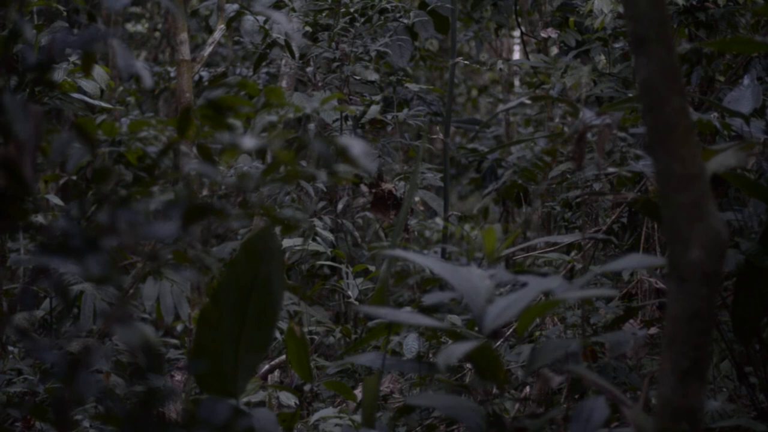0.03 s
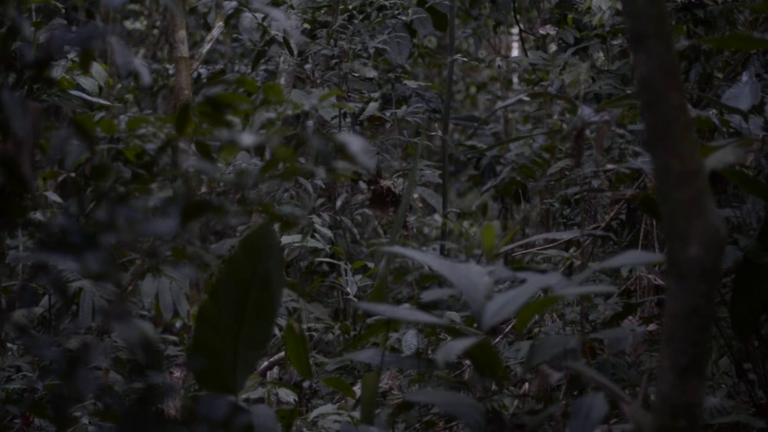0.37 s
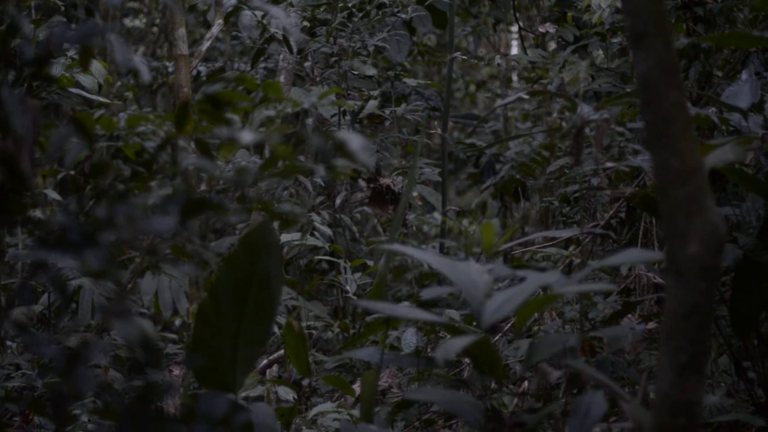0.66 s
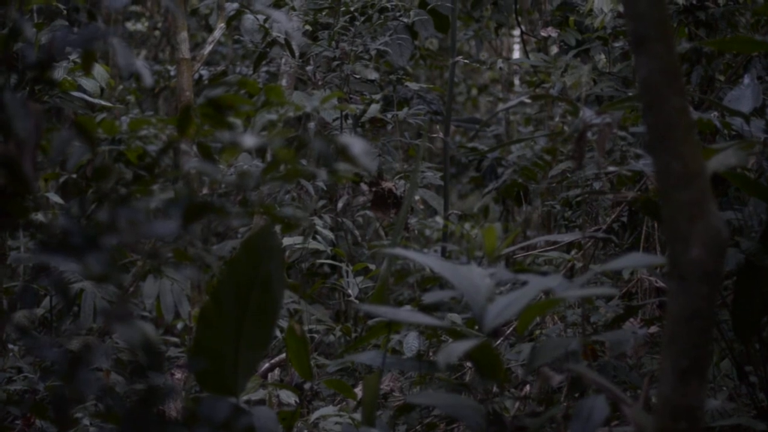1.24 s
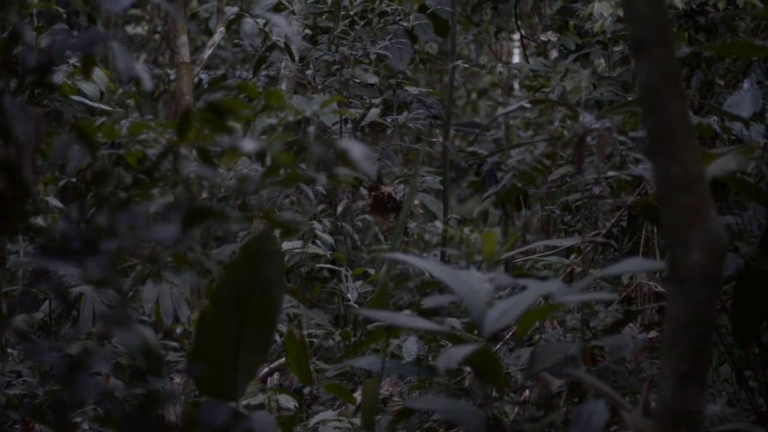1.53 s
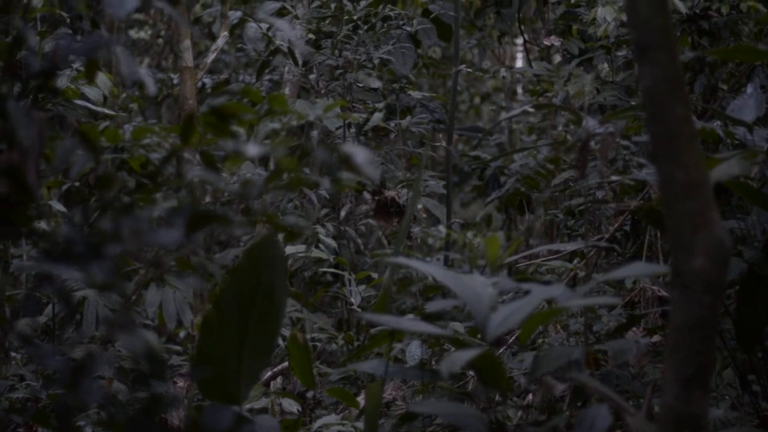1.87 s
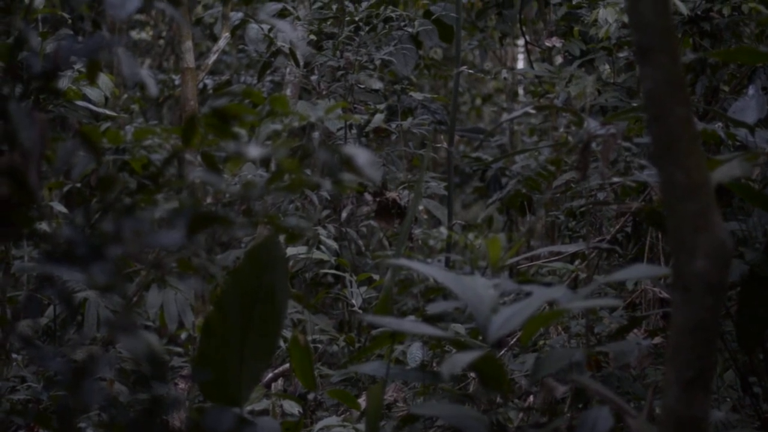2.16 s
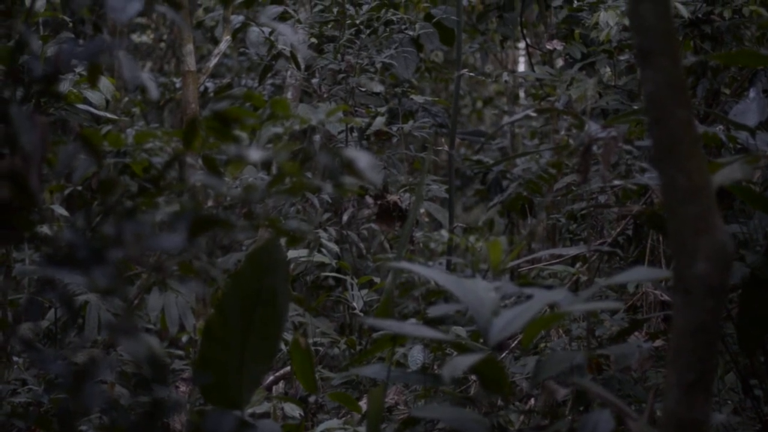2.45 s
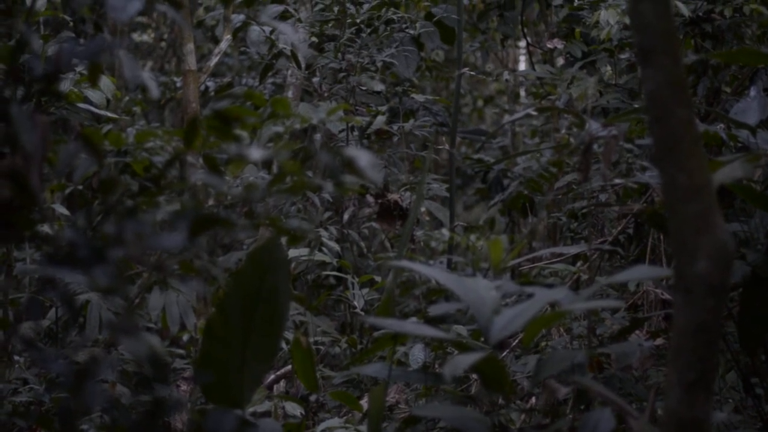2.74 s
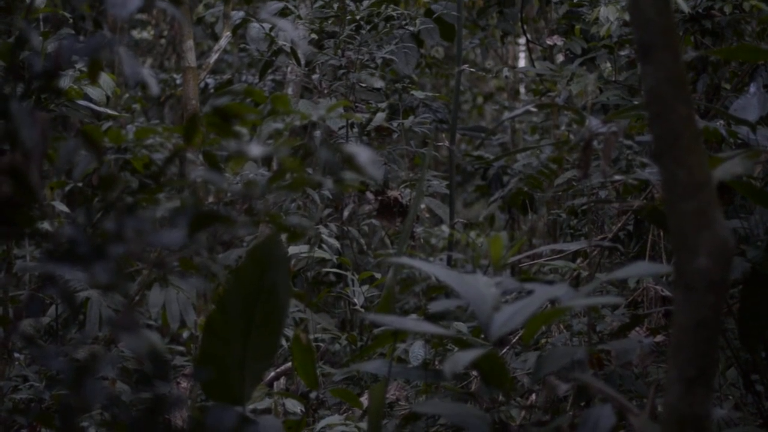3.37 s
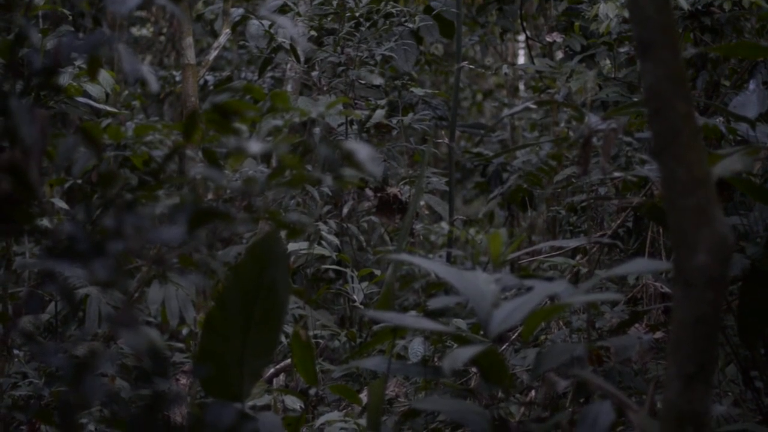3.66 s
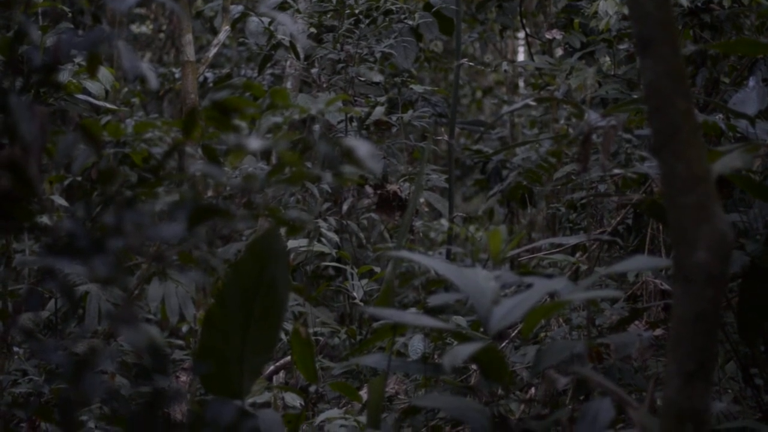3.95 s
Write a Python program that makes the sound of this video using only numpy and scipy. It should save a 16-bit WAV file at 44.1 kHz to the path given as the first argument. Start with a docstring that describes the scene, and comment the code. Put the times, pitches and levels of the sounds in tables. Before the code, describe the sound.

Crickets fill a nighttime rainforest with steady, high trilling and buzzing. Throughout, a nearby frog calls in an even rhythm, each rasp followed by a quick falling double gulp. Tiny peeps and faint far whistles echo lightly among the trees.

```python
"""Rainforest undergrowth at night. Crickets trill in trains of tone pulses and bush crickets buzz in
bands of file noise, over a wash of far insects and the hooting drone of far frogs. A near frog repeats
a two-part call: a rasp, made by pulses that ring its vocal sac, then a falling double gulp. Small peeps
and a few faint far whistles come through, and the trees scatter the trills and calls into reverberation."""
import sys
import numpy as np
from scipy import signal
from scipy.fft import rfft, irfft
from scipy.io import wavfile

SR = 44100
rng = np.random.default_rng(int(sys.argv[2]) if len(sys.argv) > 2 else 0)


def waveform_to_disk(signal):
    """Save audio, clipped to [-1, 1], as 16-bit WAV at the path in sys.argv[1]."""
    frames = np.transpose(np.atleast_2d(signal))
    scaled = np.clip(frames, -1, 1) * 32767
    samples = np.round(scaled).astype(np.int16)
    wavfile.write(sys.argv[1], SR, samples)


N = 176400

# Reverberation among the trees. Each row: frequency in Hz, time to decay by 60 dB in seconds.
FOREST_DECAY = [(300, 0.35), (750, 0.68), (1200, 0.89), (1800, 0.98), (4000, 1), (10000, 0.21)]

# Spectra of far insects, of still air and far leaves, and of a faint top hiss.
# Each row: frequency in Hz, relative spectral density in dB.
INSECT_SPECTRUM = [(1800, -29), (2500, -18), (3150, 1.5), (3700, 12), (3900, 4.5), (4200, -4.5),
                   (4700, -7.5), (5350, -1.5), (5750, 1), (6350, -4), (6650, -11), (6900, -18), (7050, -8),
                   (7650, -1.5), (8100, -10.5), (8900, -20), (9400, 0), (9700, -5.5), (9930, -21.5),
                   (10400, -35.5), (12000, -65.5)]
AIR_SPECTRUM = [(20, -16.5), (60, -6), (130, -0.5), (300, 1.5), (450, 0), (750, 3.5), (1100, 2), (1600, 13),
                (2200, 7.5), (3000, 15), (5000, -29)]
HISS_SPECTRUM = [(8000, -27), (10300, -4), (11600, -1.5), (12600, -8), (14000, -25.5), (15000, -45.5)]
# The course of the top hiss. Each row: time in seconds, level in dB.
HISS_LEVELS = [(0, -73.5), (1.199, -74.5), (2.002, -71), (2.779, -68), (2.9, -74), (4, -73)]
INSECTS_DB, AIR_DB = -36, -52

# Trilling and hooting animals. Each row: pitch in Hz, pitch wander in Hz, fall within a pulse in Hz,
# pulses per second, level in dB.
NEAR_CRICKETS = [(3623, 12.24, 60, 25, -33.5), (3408, 3, 6, 11.5, -36.5)]
FAR_CRICKETS = [(3602, 22, 41, 38, -33), (3659, 16, 26, 17, -35), (3410, 12, 14, 12, -38.5),
                (3228, 9.98, 13, 19, -44), (3767, 9, 7.1, 16, -44.5), (4019, 28, 50, 16, -45.5),
                (3015, 8, 9.6, 8, -52.5)]
FAR_FROGS = [(1336.4, 2.4, 4.6, 9, -44), (1366.5, 6.01, 14, 14, -47.5)]
# Bush crickets. Each row: band centre in Hz, half width in Hz, wing strokes per second,
# modulation depth from 0 to 1, level in dB.
BUSH_CRICKETS = [(6111, 160, 16.3, 0.23, -38.5), (6080, 160, 108, 0.6, -41), (7736, 70, 29, 0.3, -50),
                 (8260, 78, 100, 0.2, -53), (8750, 64, 17, 0, -54.5), (9550, 103, 72, 0.26, -46)]
RATE_DRIFT, TRILL_SWELL_DB = 0.0694, 0.77
# Flares of the loudest trill. Each row: start in seconds, length in seconds, level in dB.
FLARES = [(.01, .026, -21.5), (.104, .014, -19), (.143, .016, -20), (.264, .024, -21), (.297, .02, -21.5),
          (.756, .018, -21), (.962, .013, -12.8), (3.287, .048, -21), (3.927, .018, -21.5)]

# The first part of each frog call. Each row: start in seconds, level in dB, pitch in Hz.
RASPS = [(.347, -32.5, 1620), (.807, -32, 1570), (1.219, -31, 1732), (1.617, -31, 1677),
         (2.042, -30.5, 1703), (2.469, -29.5, 1726), (2.978, -30, 1660), (3.46, -30, 1705)]
# Vocal sac resonances. Each row: multiple of the rasp pitch, width in Hz, relative level in dB.
SAC_MODES = [(.87, 280, 2), (1.025, 290, 10)]
RASP_S, RASP_ATTACK_S, RASP_RELEASE_S = 0.077, .005, .009
RASP_PULSES_PER_S, RASP_JITTER, RASP_GRIT, RASP_RISE = 138, .16, 0.6, 0.068
SAC_BAND_HZ = (1240, 2135)
OVERTONE_HZ, OVERTONE_WIDTH_HZ, OVERTONE_DB = 2950, 850, -14.5
CATCH_AT_S, CATCH_WIDTH_S, CATCH_DB = 0.052, 0.014, -7
RASP_OPENING_DB, RASP_FADE_DB = -2.8, -2.5

# Small peeps near 5 kHz, and short tones near 2.8 kHz that sound as some frog calls begin. # Each row: start in
# seconds, pitch in Hz, level in dB.
PEEPS = [(.38, 5300, -42.5), (.78, 5120, -49), (.79, 2830, -45.5), (1.239, 5220, -47), (1.63, 5200, -46.5),
         (2.021, 2870, -44.5), (2.07, 5345, -44), (2.45, 2850, -45.5), (2.481, 5330, -41), (2.9, 5130, -44),
         (3.31, 5100, -46), (3.782, 5370, -43)]
PEEP_S, PEEP_WANDER_HZ = 0.1, 64

# The second part of each frog call. Each row: start in seconds, level in dB.
GULPS = [(.444, -48), (.912, -46), (1.314, -45.5), (1.711, -47), (2.144, -49), (2.571, -47.5), (3.073, -47),
         (3.560, -47.5)]
# The two notes of a gulp. Each row: delay in seconds, length in seconds, starting pitch in Hz,
# settled pitch in Hz, sag in Hz per second, relative level in dB.
GULP_NOTES = [(0, .038, 1500, 750, 400, 1), (.037, .025, 1400, 690, 6200, -2.5)]
GULP_ATTACK_S, GULP_DROP_S, GULP_RELEASE_S = .0015, 0.00269, .007
GULP_JITTER, GULP_SHIMMER_DB, GULP_OCTAVE_DB = .015, 1.5, -7
# The throaty scrape of a gulp note. Each row: frequency in Hz, relative spectral density in dB.
SCRAPE_SPECTRUM = [(400, -47.5), (800, -12), (1100, -7), (1400, 1), (1850, 0), (2300, -18), (3000, -11),
                   (5000, -21), (9000, -66)]
SCRAPE_DB, SCRAPE_ATTACK_S, SCRAPE_DECAY_S = 12.5, 0.0022, 0.038
RASP_WET_DB, GULP_WET_DB, SCRAPE_WET_DB, SMALL_CALL_WET_DB = -5, -9, -2.5, -1.5

# Far whistles, clear or hoarse. Each row: start in seconds, length in seconds, starting pitch in Hz,
# final pitch in Hz, pitch wander in Hz, level in dB.
WHISTLES = [(0.539, 0.53, 980, 930, 230, -52), (1.15, .11, 672, 645, 30, -58),
            (1.15, .1, 1008, 1000, 18, -55.5), (1.17, .4, 1250, 990, 10, -45.5),
            (1.325, 0.31, 1280, 1240, 25, -54), (1.332, .25, 942, 745, 170, -55)]
CUTOFF_HZ = 15700


def gain_of(db):
    """Amplitude grows tenfold for every 20 decibels."""
    return 10 ** (np.asarray(db) / 20)


def unit_rms(x):
    """Normalisation brings the root-mean-square amplitude to 1."""
    return x / np.sqrt(np.mean(x ** 2) + 1e-20)


def curve_at(points, hz):
    """Interpolation reads a curve on a logarithmic frequency axis."""
    f, value = np.transpose(points)
    return np.interp(np.log(hz + 1), np.log(f + 1), value)


def add(mix, start_s, sound):
    """Superposition: a sound adds to the mix from its start onward."""
    part = mix[max(round(start_s * SR), 0):][:len(sound)]
    part += sound[:len(part)]


def drift(rate, size=N):
    """Random modulation of about unit size: straight lines join `rate` random values a second."""
    knots = rng.standard_normal(4096)
    return np.interp(np.arange(size) * rate / SR, np.arange(len(knots)), knots)


def tone(hz):
    """The phase of a sine is the running integral of its frequency."""
    return np.sin(2 * np.pi * (np.cumsum(hz) / SR + rng.random()))


def noise(spectrum):
    """Spectral shaping colours white noise; the result has rms 1."""
    gains = gain_of(curve_at(spectrum, np.fft.rfftfreq(N, 1 / SR)))
    return unit_rms(irfft(rfft(rng.standard_normal(N)) * gains, N))


def resonate(x, hz, width_hz):
    """A resonator passes a narrow band, here centred on the moving frequency hz."""
    carrier = np.exp(2j * np.pi * np.cumsum(hz) / SR)
    pole = np.exp(-np.pi * width_hz / SR)
    return (carrier * signal.lfilter([(1 - pole) ** 2], [1, -2 * pole, pole * pole], x / carrier)).real


def forest(x):
    """Scattering: trunks and leaves return sparse reflections, each band decaying at its own rate."""
    reflections = np.zeros(SR)
    slots = np.arange(200, SR - 20, 20)
    reflections[slots + rng.integers(0, 20, len(slots))] = rng.choice([-1., 1.], len(slots))
    hz, t, bands = signal.stft(reflections, SR, nperseg=256)
    decay = gain_of(-60 * t / curve_at(FOREST_DECAY, hz)[:, None])
    tail = signal.istft(bands * decay, SR, nperseg=256)[1]
    return signal.fftconvolve(x, tail / np.linalg.norm(tail))[:len(x)]


def wash():
    """Incoherent sources sum to noise: countless far insects, over still air and a faint top hiss."""
    insects = gain_of(INSECTS_DB) * noise(INSECT_SPECTRUM)
    air = gain_of(AIR_DB) * noise(AIR_SPECTRUM)
    hiss_db = np.interp(np.arange(N) / SR, *np.transpose(HISS_LEVELS))
    return insects + air + gain_of(hiss_db) * noise(HISS_SPECTRUM)


def stroke_phase(rate):
    """In a nearly periodic rhythm, phase runs from 0 to 1 in each stroke while the rate drifts."""
    return (np.cumsum(rate * (1 + RATE_DRIFT * drift(8))) / SR + rng.random()) % 1


def trill(hz, wander_hz, fall_hz, rate, level_db, sharpness, wet_db, animals):
    """Amplitude and frequency modulation divide each animal's tone into pulses that fall in pitch."""
    direct = np.zeros(N)
    for _ in range(animals):
        phase = stroke_phase(rate)
        pitch = hz + wander_hz * drift(rate) + fall_hz * (.5 - phase)
        pulses = np.sin(np.pi * phase) ** sharpness
        direct += pulses * gain_of(TRILL_SWELL_DB * drift(rate)) * tone(pitch)
    # A second of lead-in leaves the forest already ringing at the start.
    scattered = unit_rms(forest(np.r_[direct[-SR:], direct])[SR:])
    return gain_of(level_db) * unit_rms(unit_rms(direct) + gain_of(wet_db) * scattered)


def bush_cricket(hz, half_width_hz, rate, depth, level_db):
    """Stridulation: a band of file noise is modulated in amplitude by the wing strokes."""
    band = np.exp(-.5 * ((np.fft.rfftfreq(N, 1 / SR) - hz) / half_width_hz) ** 2)
    file_noise = irfft(rfft(rng.standard_normal(N)) * band, N)
    throb = 1 + depth * np.cos(2 * np.pi * stroke_phase(rate))
    return gain_of(level_db) * unit_rms(file_noise * throb)


def chorus():
    """Crickets, far frogs and bush crickets superpose; far crickets are more reverberant than near."""
    near = sum(trill(*row, sharpness=2.2, wet_db=-7.5, animals=1) for row in NEAR_CRICKETS)
    far = sum(trill(*row, sharpness=2.1, wet_db=0, animals=2) for row in FAR_CRICKETS)
    hoots = sum(trill(*row, sharpness=0.72, wet_db=-6.5, animals=1) for row in FAR_FROGS)
    return near + far + hoots + sum(bush_cricket(*row) for row in BUSH_CRICKETS)


def glide(length_s, start_hz, end_hz, wander_hz, level_db):
    """A linear sweep swells and fades under a half sine; random frequency modulation roughens it."""
    progress = np.arange(0, length_s, 1 / SR) / length_s
    pitch = start_hz + (end_hz - start_hz) * progress + wander_hz * drift(260, len(progress))
    return gain_of(level_db) * np.sin(np.pi * progress) * tone(pitch)


def flares():
    """Tone bursts near the pitch of the loudest trill fuse with it, so it briefly stands out."""
    out = np.zeros(N)
    for start, length, db in FLARES:
        add(out, start, glide(length, start_hz=3715, end_hz=3620, wander_hz=0, level_db=db))
    return out


def rasp(level_db, hz):
    """Source and filter: uneven pulses ring the frog's vocal sac, rising in pitch and brightness."""
    t = np.arange(0, RASP_S + 4 * RASP_RELEASE_S, 1 / SR)
    progress = np.minimum(t / RASP_S, 1)
    cycles = np.cumsum(RASP_PULSES_PER_S * (1 + RASP_JITTER * drift(RASP_PULSES_PER_S, len(t)))) / SR
    pulses = unit_rms(np.diff(np.floor(cycles), prepend=-1))
    drive = pulses + RASP_GRIT * rng.standard_normal(len(t))
    pitch = hz * (1 + RASP_RISE * (progress - .5))
    sac = sum(gain_of(db) * unit_rms(resonate(drive, pitch * ratio, width))
              for ratio, width, db in SAC_MODES)
    sac = signal.sosfilt(signal.butter(4, SAC_BAND_HZ, "band", fs=SR, output="sos"), sac)
    overtones = unit_rms(resonate(drive, np.full(len(t), OVERTONE_HZ), OVERTONE_WIDTH_HZ))
    voice = unit_rms(sac) + gain_of(OVERTONE_DB) * progress * overtones
    # The level opens softly, dips in a brief catch, and eases toward the end.
    opening_db = RASP_OPENING_DB * np.exp(-(t / CATCH_AT_S) ** 2)
    catch_db = CATCH_DB * np.exp(-((t - CATCH_AT_S) / CATCH_WIDTH_S) ** 2)
    effort_db = opening_db + catch_db + RASP_FADE_DB * progress ** 2 + 1.3 * drift(70, len(t))
    envelope = np.minimum(t / RASP_ATTACK_S, 1) * np.exp(-np.maximum(t - RASP_S, 0) / RASP_RELEASE_S)
    return gain_of(level_db + effort_db) * envelope * voice


def peeps():
    """Random frequency modulation spreads each short, high peep into a narrow band."""
    out = np.zeros(N)
    for start, hz, db in PEEPS:
        add(out, start, glide(PEEP_S, hz, hz, PEEP_WANDER_HZ, db))
    return out


def gulp_note(length_s, start_hz, settled_hz, sag_hz_per_s, throat_noise):
    """Exponential relaxation drops the pitch fast, then it sags; a decaying scrape goes with it."""
    t = np.arange(0, length_s, 1 / SR)
    hz = settled_hz + (start_hz - settled_hz) * np.exp(-t / GULP_DROP_S) - sag_hz_per_s * t
    hz *= 1 + GULP_JITTER * drift(RASP_PULSES_PER_S, len(t))
    voice = tone(hz) + gain_of(GULP_OCTAVE_DB) * tone(2 * hz)
    voice *= gain_of(GULP_SHIMMER_DB * drift(RASP_PULSES_PER_S, len(t)))
    scrape = np.minimum(t / SCRAPE_ATTACK_S, 1) * np.exp(-t / SCRAPE_DECAY_S) * throat_noise[:len(t)]
    envelope = np.clip(np.minimum(t / GULP_ATTACK_S, (length_s - t) / GULP_RELEASE_S), 0, 1)
    return envelope * voice, envelope * scrape


def frog():
    """Multipath propagation: each rasp and its double gulp arrive directly and by way of the trees."""
    rasps, gulps, scrapes = np.zeros((3, N))
    throat_noise = noise(SCRAPE_SPECTRUM)
    for start, db, hz in RASPS:
        add(rasps, start, rasp(db, hz))
    for start, gulp_db in GULPS:
        for delay, *note, note_db in GULP_NOTES:
            onset = start + delay
            voice, scrape = gulp_note(*note, throat_noise[round(onset * SR):])
            add(gulps, onset, gain_of(gulp_db + note_db) * voice)
            add(scrapes, onset, gain_of(gulp_db + note_db + SCRAPE_DB) * scrape)
    scattered = forest(gain_of(RASP_WET_DB) * rasps + gain_of(GULP_WET_DB) * gulps
                       + gain_of(SCRAPE_WET_DB) * scrapes)
    return rasps + gulps + scrapes + scattered


def far_whistles():
    """Frequency modulation shapes each falling call: the wider its wander, the hoarser it sounds."""
    out = np.zeros(N)
    for start, *call in WHISTLES:
        add(out, start, glide(*call))
    return out


def scene():
    """All sources superpose in one channel, the frog in front of the chorus."""
    small_calls = peeps() + far_whistles()
    scattered_calls = gain_of(SMALL_CALL_WET_DB) * forest(small_calls)
    return (wash() + chorus() + flares() + frog() + small_calls + scattered_calls)[None]


def record(dry):
    """Band limiting: a linear-phase low-pass filter removes the highest treble."""
    low_pass = signal.firwin(511, CUTOFF_HZ, window=("kaiser", 9), fs=SR)
    return signal.oaconvolve(dry, low_pass[None], "same")


dry = scene()
out = record(dry)
waveform_to_disk(out)
```